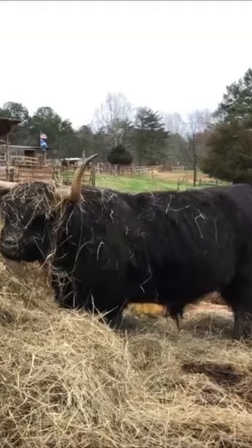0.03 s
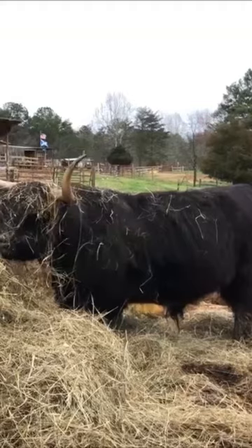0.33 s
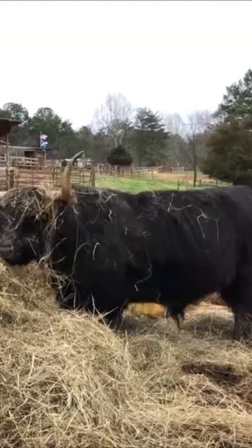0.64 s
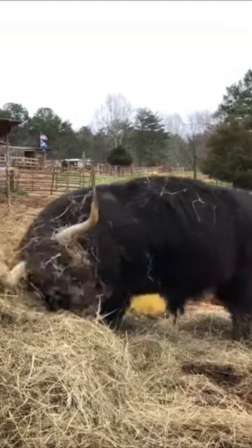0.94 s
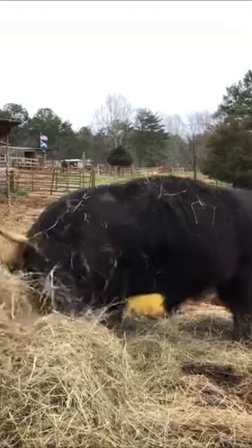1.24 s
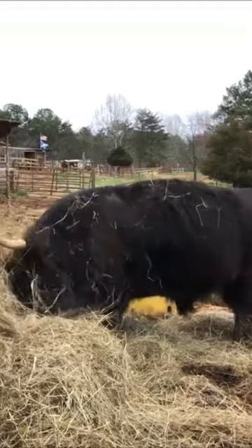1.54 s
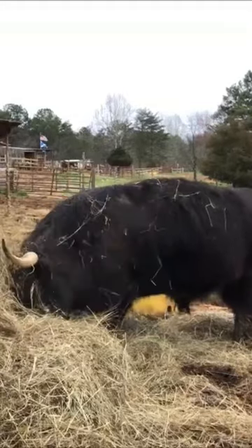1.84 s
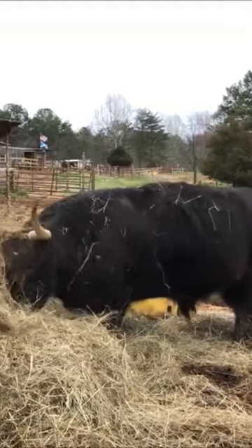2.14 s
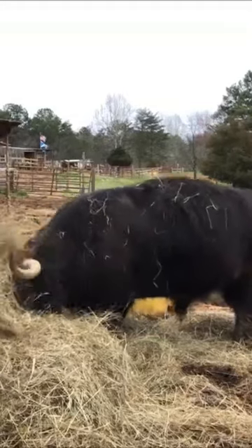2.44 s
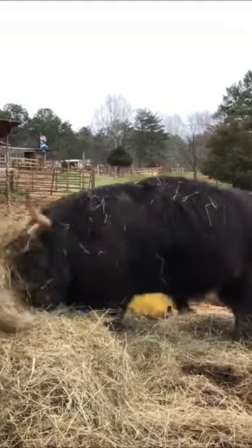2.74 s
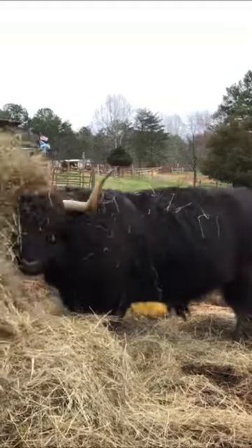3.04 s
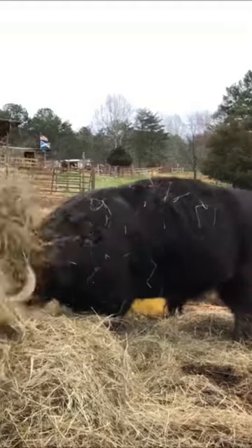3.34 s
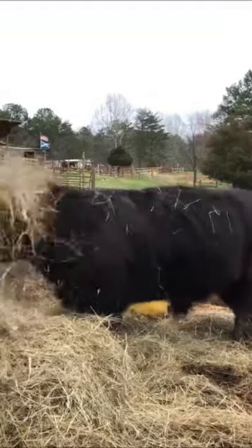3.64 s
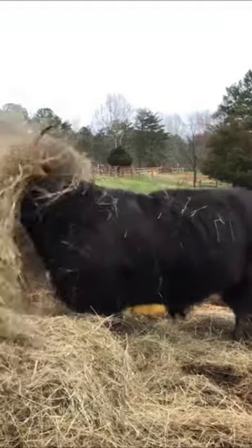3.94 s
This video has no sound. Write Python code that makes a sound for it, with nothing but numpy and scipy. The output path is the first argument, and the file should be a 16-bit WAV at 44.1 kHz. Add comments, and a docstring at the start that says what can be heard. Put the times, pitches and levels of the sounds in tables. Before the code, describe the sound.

Dry hay rustles and crunches as a bull digs his head in, snorts, shoves more lightly, then tosses it loudly. Soft thuds and faint distant birds sound over a low rumble, a few metres away in an open paddock.

```python
"""Open paddock, one microphone a few metres from a bull at a hay pile, over a low outdoor rumble.
First come soft thuds of head and hooves, stems cracking and small birds far off. Near 0.8 s he digs
his head in: countless dry stalks tick and slide, the packed pile crunches, and he snorts.
Lighter shoves follow, with a heavy thud at 1.7 s and a softer snort at 2.3 s.
Past 3 s he tosses the hay, the rustle at its loudest and brightest, and a few more thuds land."""
import sys
import numpy as np
from scipy import signal
from scipy.fft import rfft, irfft
from scipy.io import wavfile
from scipy.ndimage import uniform_filter1d

SR = 44100
rng = np.random.default_rng(int(sys.argv[2]) if len(sys.argv) > 2 else 0)


def digitize_waveform(pressure):
    """Quantize a signal to 16-bit integers and store it at the path in sys.argv[1].

    Rows of a 2-D input are taken as channels; values are limited to [-1, 1].
    """
    field = np.atleast_2d(pressure).T
    bounded = np.clip(field, -1, 1)
    quanta = np.round(bounded * 32767).astype(np.int16)
    wavfile.write(sys.argv[1], SR, quanta)


N = 176400
T = np.arange(N) / SR


def hay_rustle():
    """Dry stalks of many sizes tick and slide, busier and brighter as the pile moves harder."""
    # movement of the hay: t/s, relative level/dB
    movement = [(0.04, -62), (0.16, -60), (0.24, -67.5), (0.71, -65), (0.82, -47), (0.83, -50.5),
                (0.97, -42.5), (1.09, -44), (1.37, -54.5), (1.64, -59.5), (1.74, -52), (1.84, -60.5),
                (2.05, -52), (2.18, -50), (2.29, -57), (2.37, -57), (2.53, -49.5), (2.69, -50.5),
                (2.74, -46), (2.8, -48.5), (2.91, -44), (3.12, -47), (3.28, -37.5), (3.39, -42),
                (3.57, -45), (3.63, -42), (3.75, -46.5), (4.0, -49)]
    # spectrum of dry stalks: f/Hz, relative level/dB
    stalk_spectrum = [(150, -23.5), (280, -10), (460, -7), (660, -14), (950, -7.5), (1400, -11), (2000, -9),
                      (3100, -5), (3700, -5.5), (4250, -3), (5200, -5), (6600, -3.5), (7600, -1.9),
                      (8800, 0), (10500, -1.5), (15500, -1.4)]
    busy_db, busy_ticks_per_s = -46.5, 9000
    tick_db, slide_db = -5, -0.5
    stem_q, stem_wander_db = 12, 2
    treble_hz, treble_db_per_db = 7240, 0.2163
    level_db = curve(movement)
    rate = busy_ticks_per_s * undb(level_db - busy_db) ** .6
    stem_pitches = np.geomspace(1200, 14500, num=22)
    stems = 0
    for hz in stem_pitches:  # each size of stalk rings at its own pitch, and comes and goes
        stem = ring(ticks(rate / len(stem_pitches)), hz, hz / stem_q)
        stems = stems + stem * undb(stem_wander_db * wander(23))
    ticking = (ticks(rate) + unit(stems)) * undb(tick_db)
    sliding = noise() * undb(slide_db)
    rustle = colour(ticking + sliding, stalk_spectrum)
    treble = signal.sosfiltfilt(signal.butter(2, treble_hz, "high", fs=SR, output="sos"), rustle)
    treble_gain = undb(treble_db_per_db * (level_db - busy_db))
    flutter_db = 0.42 * wander(34)
    return (rustle + treble * (treble_gain - 1)) * undb(level_db + 2.02 + flutter_db)


def hay_crush():
    """The packed pile crunches dully under the weight of the head."""
    # weight of the head on the pile: t/s, level/dB
    pressure = [(.04, -72.5), (.7, -79.5), (.85, -61), (1.12, -59), (1.27, -57), (1.36, -69.5),
                (1.66, -70.5), (1.77, -62), (1.83, -72.5), (2.07, -60.5), (2.45, -67), (2.8, -60),
                (3.05, -62.5), (3.23, -54), (3.38, -69), (3.5, -63), (4.0, -66.5)]
    # spectrum of packed hay: f/Hz, relative level/dB
    crush_spectrum = [(100, 1.5), (200, -3.5), (500, 0), (900, -1.5), (1800, -1.5), (3000, -7.5),
                      (6000, -21)]
    return colour(ticks(rate=1800), crush_spectrum) * undb(curve(pressure) + 1.2 * wander(30))


def thuds():
    """Blows on padded ground: a few low cycles sag in pitch, earth crumbles, hay crunches, soil booms."""
    # head and hooves: peak t/s, level/dB, f/Hz at the peak, decay/s, crunch level/dB
    blows = [(0.107, -50.5, 70.4, 0.022, -74), (0.395, -60, 75, 0.025, -73),
             (0.491, -47.5, 138, 0.0072, -65), (0.649, -44.5, 148, .010, -68), (.83, -62, 99, 0.013, -54),
             (0.912, -50.5, 97, 0.017, -59), (1.063, -45, 139, 0.016, -58), (1.153, -50, 82, 0.025, -73),
             (1.255, -48.5, 186, 0.017, -61), (1.304, -49, 132, 0.0082, -68),
             (1.495, -50.5, 66.6, 0.031, -61.5), (1.686, -48, 198, 0.0102, -65),
             (1.706, -38.5, 101, 0.014, -64), (1.772, -45.5, 61.7, 0.018, -54),
             (1.978, -54, 55, 0.018, -76), (2.038, -58.5, 132, 0.019, -65), (2.453, -55.5, 60, 0.024, -69),
             (2.741, -47.5, 113, 0.017, -78), (3.485, -45.5, 113, 0.02, -52),
             (3.729, -54.5, 99, 0.015, -66), (3.9, -43.5, 74, 0.015, -70), (3.943, -46.5, 94.5, 0.023, -62),
             (3.983, -42, 79.5, .016, -68)]
    # spectrum of hay under a blow: f/Hz, relative level/dB
    crunch_spectrum = [(180, -8), (330, 0.5), (520, -4.5), (900, -10.5), (2000, -18), (5000, -15)]
    sag_octaves, earth_db = 0.84, -13  # the pitch falls from this far above f to as far below
    ground_hz, ground_db, ground_decay_s = 51, -15, 0.058
    crunch = colour(noise(), crunch_spectrum)
    out = 0
    for at, db, hz, decay, crunch_db in blows:
        pitch = hz * 2 ** (-sag_octaves * np.tanh((T - at) / decay / 2))
        phase = 2 * np.pi * np.cumsum(pitch) / SR
        body = np.cos(phase - np.interp(at, T, phase))  # a crest lands on the peak
        earth = undb(earth_db) * unit(ring(ring(noise(), 127, 200), 150, 270))
        ground = np.cos(2 * np.pi * ground_hz * (T - at))
        boom = undb(ground_db) * swell(at, decay, ground_decay_s) * ground
        push = swell(at, 0.84 * decay, decay)
        out = out + undb(db) * (push * (body + earth) + boom) + undb(crunch_db) * push * crunch
    return out


def stem_cracks():
    """A thick stem splinters in a noise burst a few milliseconds long."""
    # breaking stems: peak t/s, level/dB, f/Hz, decay/s
    cracks = [(0.079, -54.5, 8100, 0.0049), (0.142, -57, 10000, .008), (0.395, -56, 6000, 0.0016),
              (0.816, -50.5, 3160, .006), (1.24, -50, 1910, 0.0047), (1.754, -57.5, 3520, 0.0094),
              (1.955, -53.5, 4000, 0.0049), (2.063, -55, 1500, .004), (3.084, -37.5, 8100, .001),
              (3.084, -46, 990, 0.0052), (3.086, -58, 2300, .004), (3.467, -46, 477, 0.0071),
              (3.596, -44.5, 1710, .004)]
    out = 0
    for at, db, hz, decay in cracks:
        splinter = unit(ring(noise(), hz, width_hz=0.54 * hz))
        out = out + undb(db) * swell(at, 0.00099, decay) * splinter
    return out


def snorts():
    """The bull blows air through the resonances of his nose; the softer snort is duller."""
    # puffs of breath: peak t/s, level/dB, decay/s, scale of the nose frequencies, tilt/(dB per octave)
    puffs = [(1.061, -45, 0.031, 0.96, -1), (2.342, -58.5, 0.07, 0.856, -5)]
    # nose resonances before scale and tilt: f/Hz, half-width of one filter pass/Hz, relative level/dB
    nose = [(823, 160, -0.5), (1950, 140, 2), (2520, 200, -4.5), (3350, 260, -11)]
    out = 0
    for at, db, decay, scale, tilt in puffs:
        breath = 0
        for hz, half_width, resonance_db in nose:
            centre, width = hz * scale, 2 * half_width
            band = unit(ring(ring(noise(), centre, width), centre, width))
            breath = breath + undb(resonance_db + tilt * np.log2(hz / nose[0][0])) * band
        out = out + undb(db) * swell(at, 0.64 * decay, decay) * unit(breath)
    return out


def distant_birds():
    """Small birds far from the microphone give short, gliding, slightly wavering whistles."""
    # calls: peak t/s, level/dB, f/Hz, glide/(octaves per s), rise and decay/s, waver as a share of f
    chirps = [(0.165, -58, 4280, -1, .004, 0.036), (.328, -61.5, 7350, -6, 0.011, .015),
              (1.143, -46, 2550, 3.5, .005, 0.064), (1.223, -51, 2750, 7, .008, 0.077),
              (2.972, -45.5, 2200, -4, 0.0048, 0.027)]
    out = 0
    for at, db, hz, glide, length, waver in chirps:
        octaves = glide * np.clip(T - at, -2 * length, 2 * length)
        pitch = hz * 2 ** octaves * (1 + waver * wander(430))
        whistle = np.sin(2 * np.pi * np.cumsum(pitch) / SR)
        out = out + undb(db) * swell(at, length, length) * whistle
    return out


def outdoor_rumble():
    """The low ambience of open country, gently swaying in level."""
    # outdoor air ahead of the low-pass: f/Hz, relative level/dB
    air_spectrum = [(25, -14), (36, -11.5), (54, 3), (80, -4), (140, -3), (220, -10), (340, -15),
                    (520, -15), (850, -16.5), (2000, -30), (5500, -53.5), (8000, -24), (15500, -34)]
    lowpass = signal.butter(1, 2500, fs=SR, output="sos")
    air = signal.sosfilt(lowpass, colour(noise(), air_spectrum))
    return air * undb(-59.5 + .8 * wander(6.7))


def undb(db):
    """Decibels to gain."""
    return 10 ** (np.asarray(db) / 20)


def unit(x):
    """Scale to rms 1."""
    return x / np.sqrt(np.mean(x ** 2) + 1e-30)


def curve(rows):
    """Join (t/s, value) rows by straight lines."""
    return np.interp(T, *np.array(rows).T)


def colour(x, points):
    """Causal filter through (f/Hz, level/dB) points, rolling off below the first; rms 1 out."""
    hz, db = np.array(points).T
    f = np.maximum(np.arange(N // 2 + 1) * SR / N, 1)
    gain = undb(np.interp(np.log(f), np.log(hz), db)) * np.minimum(f / hz[0], 1) ** 2
    cepstrum = irfft(np.log(gain), N)
    cepstrum[1:N // 2] *= 2  # fold onto positive time for minimum phase
    cepstrum[N // 2 + 1:] = 0
    return unit(irfft(rfft(x) * np.exp(rfft(cepstrum)), N))


def ring(x, hz, width_hz):
    """One resonance, gain 1 at its centre."""
    return signal.lfilter(*signal.iirpeak(hz, hz / width_hz, SR), x)


def noise():
    """White noise."""
    return rng.standard_normal(N)


def wander(rate):
    """Smooth random drift, about `rate` changes a second; rms 1."""
    span = int(SR / rate)
    smoothed = uniform_filter1d(noise(), span, mode="wrap")
    return unit(uniform_filter1d(smoothed, span, mode="wrap"))


def swell(at, rise, decay):
    """Rounded rise to a peak, then an exponential fall."""
    exponent = np.where(T < at, ((T - at) / rise) ** 2, (T - at) / decay)
    return np.exp(-np.minimum(exponent, 60))


def ticks(rate, spread_db=2, max_db=10):
    """Random clicks, `rate` a second, mostly small and a few large, at even mean power."""
    hit = rng.random(N) < rate / SR
    size = undb(np.minimum(spread_db * rng.exponential(size=N), max_db))
    return unit(hit * size * np.sign(noise()) / np.sqrt(rate))


def scene():
    """The bull close by and the paddock beyond, at one microphone: both channels are alike."""
    bull = hay_rustle() + hay_crush() + thuds() + stem_cracks() + snorts()
    return np.tile(bull + distant_birds() + outdoor_rumble(), (2, 1))


def record(dry):
    """The sound begins after a brief silence; the phone cuts the highest treble."""
    start_s, top_hz = .036, 15750
    lowpass = signal.ellip(12, .2, 80, top_hz, fs=SR, output="sos")
    return signal.sosfilt(lowpass, dry * (T > start_s))


dry = scene()
out = record(dry)
digitize_waveform(out)
```